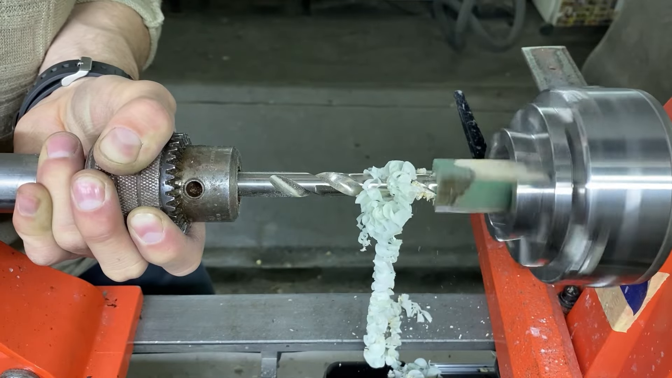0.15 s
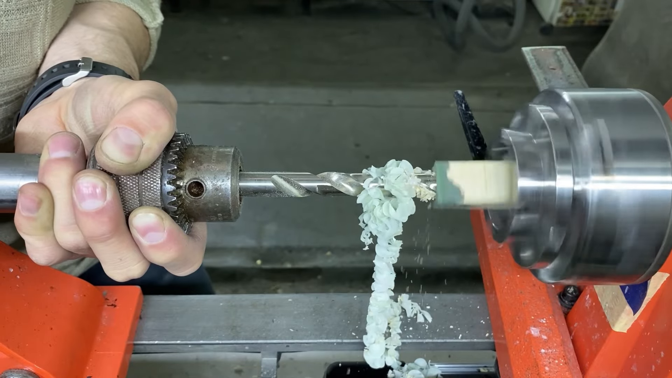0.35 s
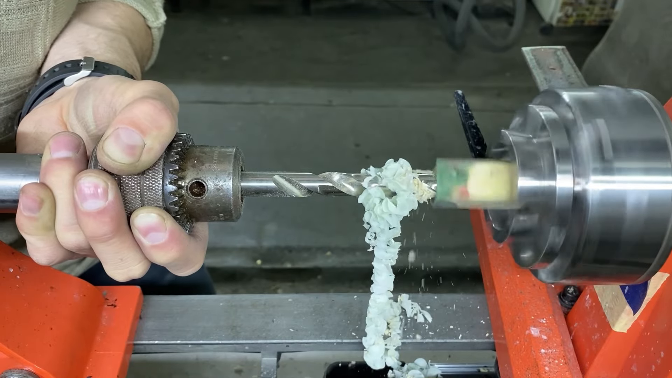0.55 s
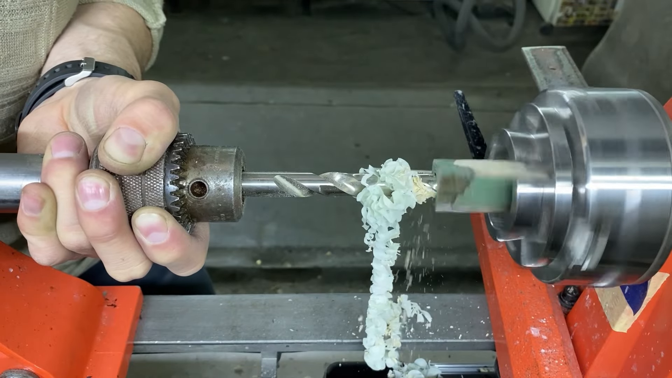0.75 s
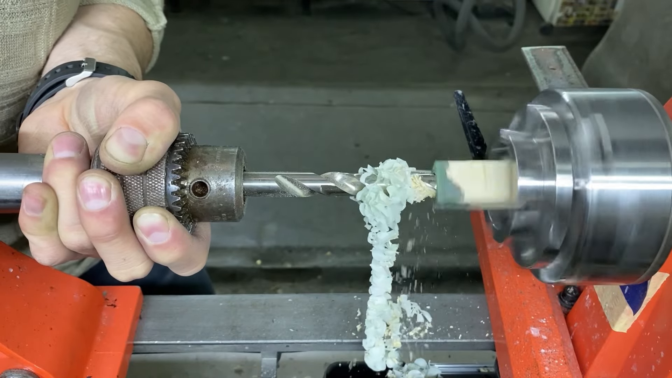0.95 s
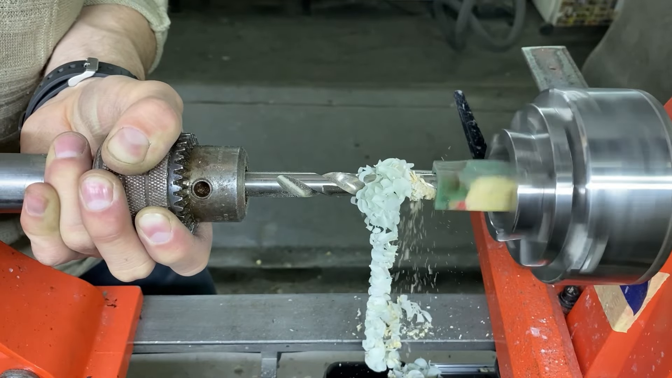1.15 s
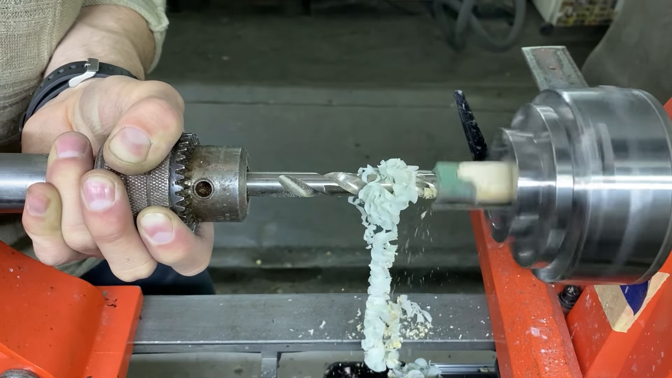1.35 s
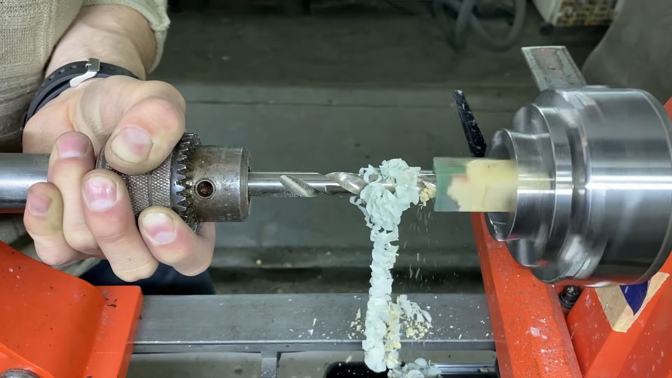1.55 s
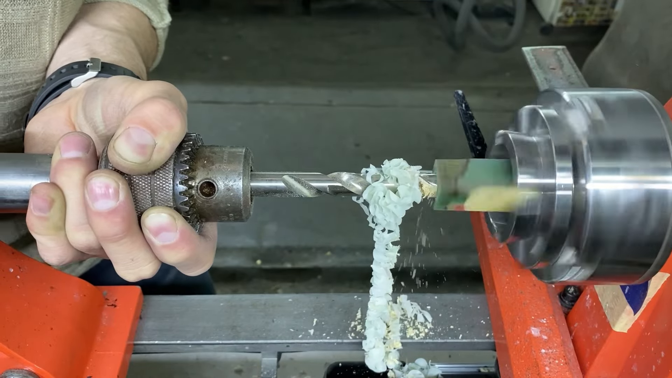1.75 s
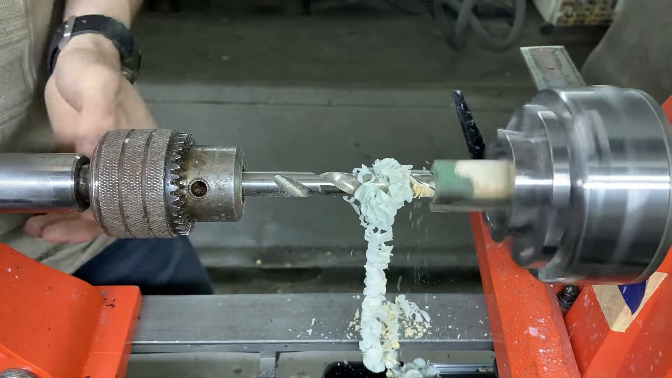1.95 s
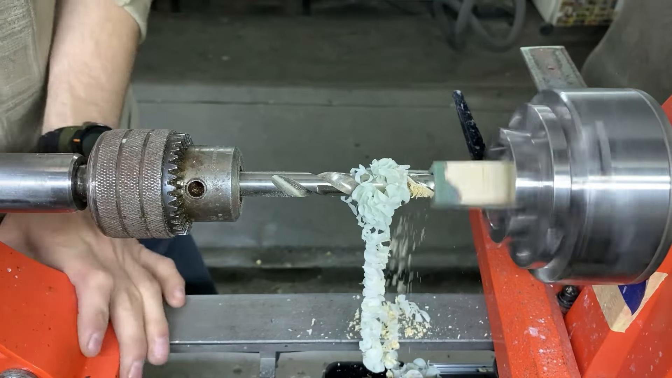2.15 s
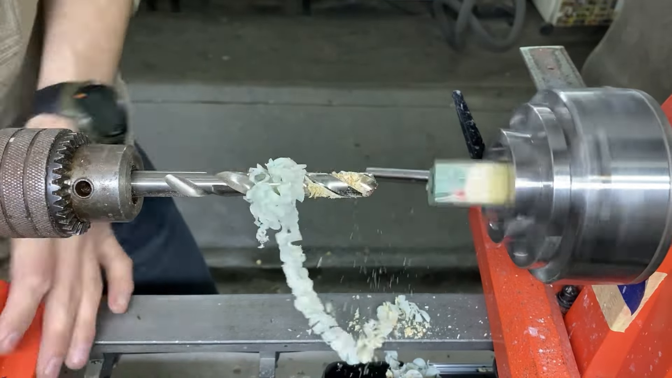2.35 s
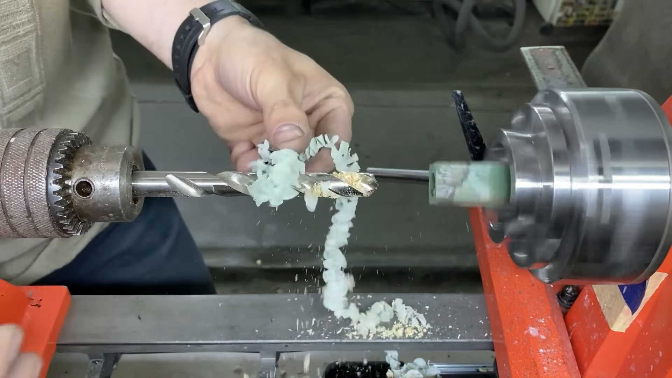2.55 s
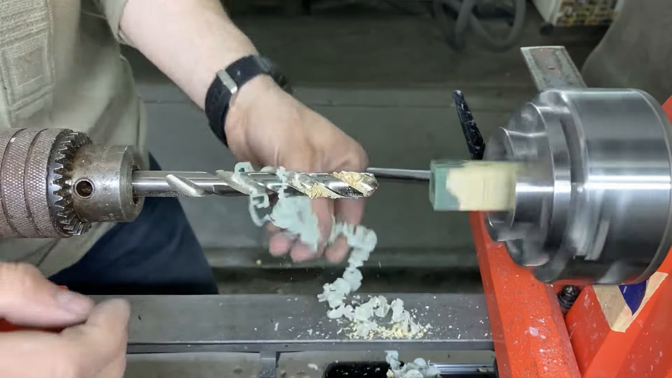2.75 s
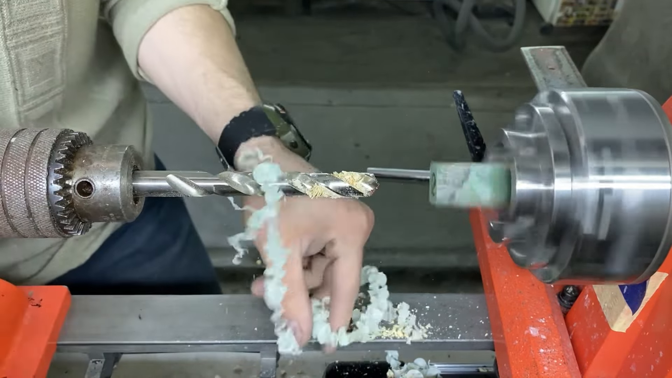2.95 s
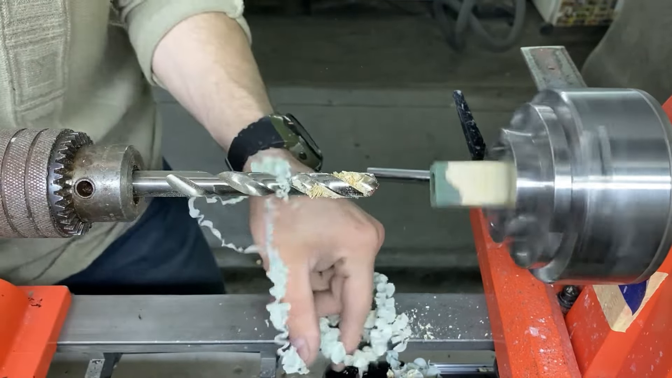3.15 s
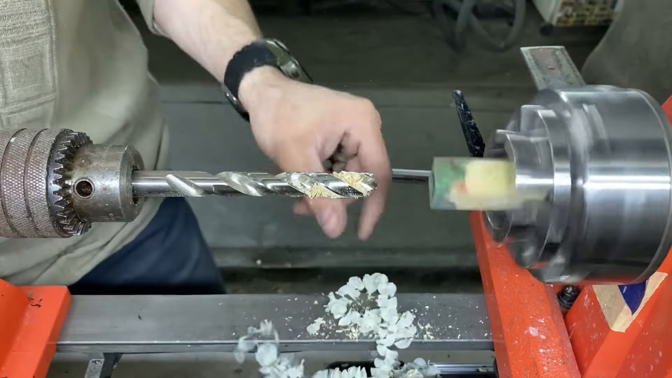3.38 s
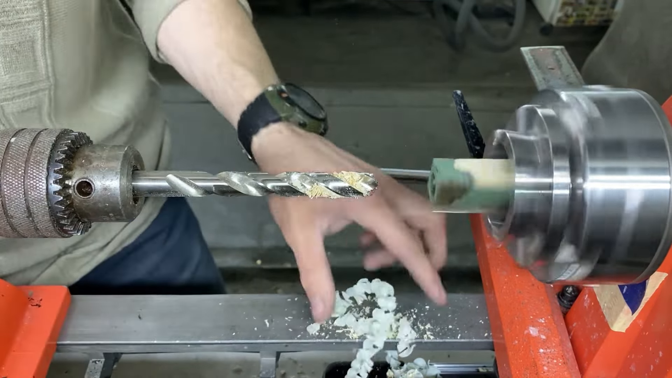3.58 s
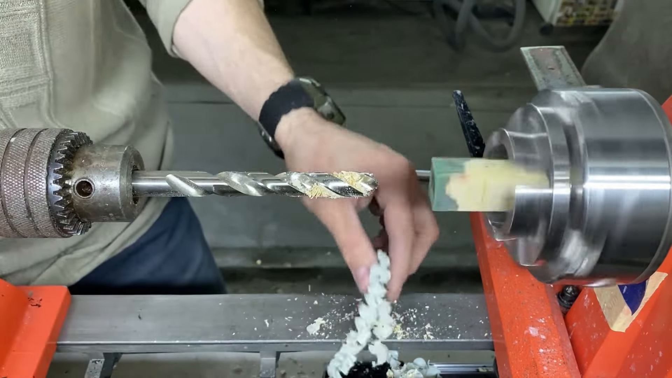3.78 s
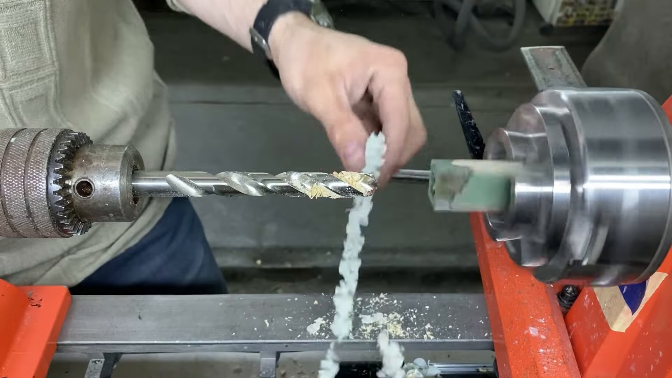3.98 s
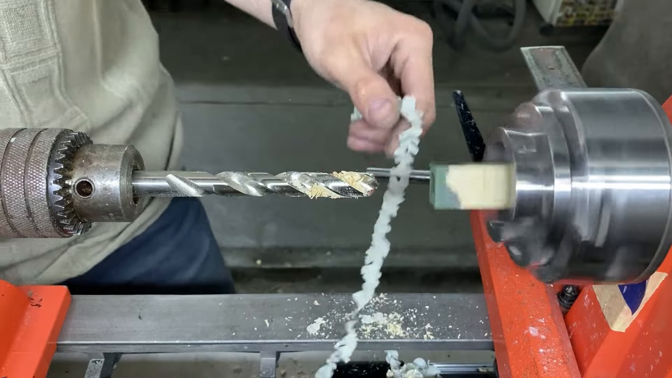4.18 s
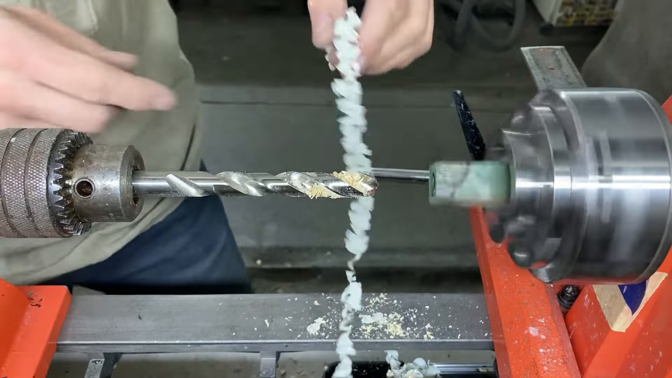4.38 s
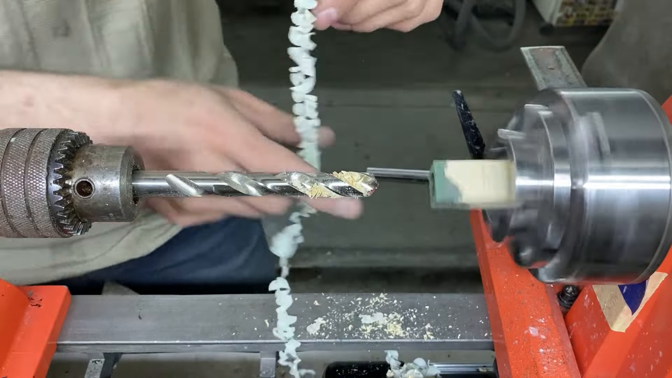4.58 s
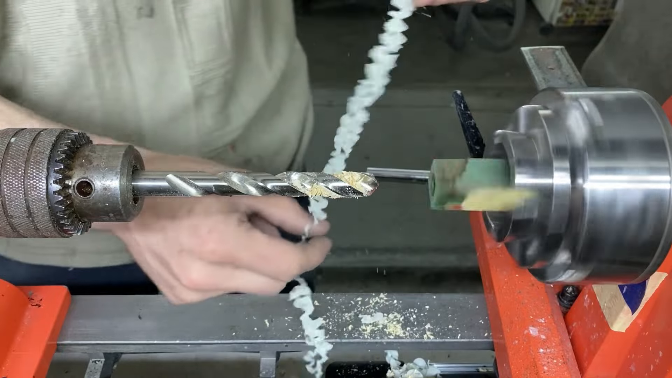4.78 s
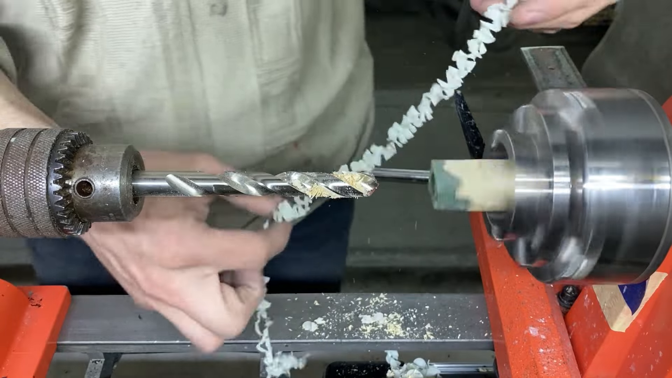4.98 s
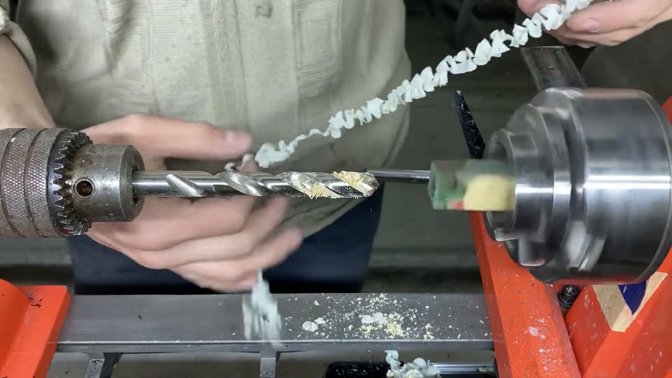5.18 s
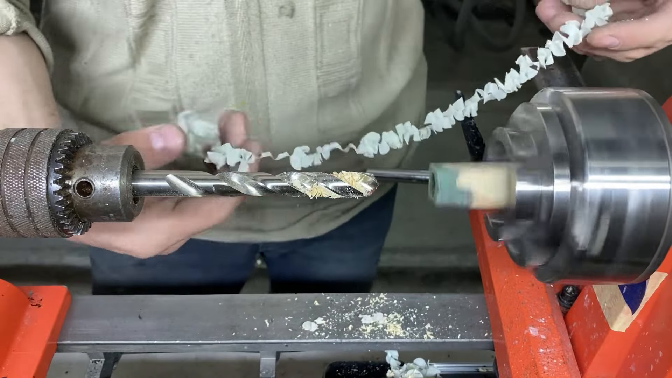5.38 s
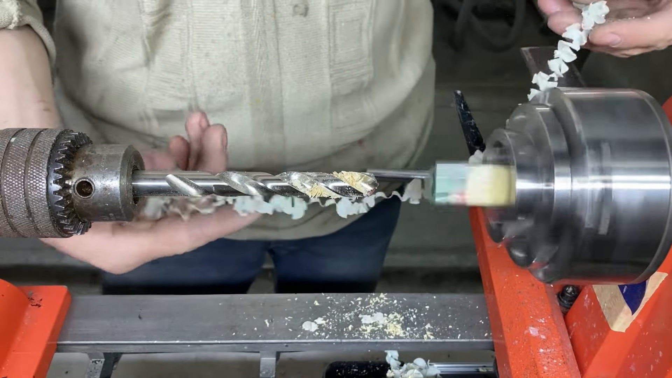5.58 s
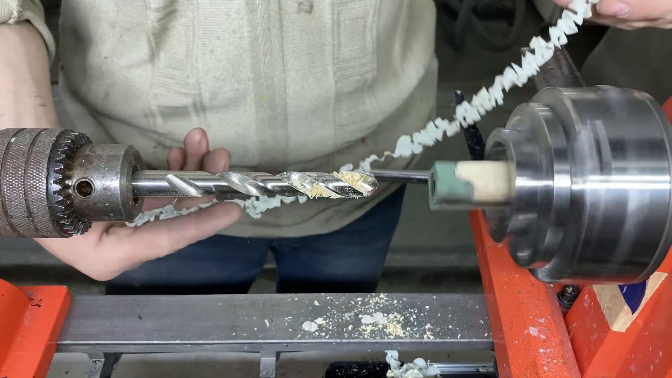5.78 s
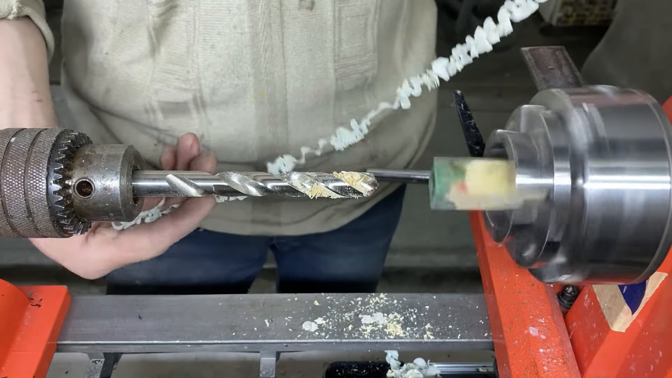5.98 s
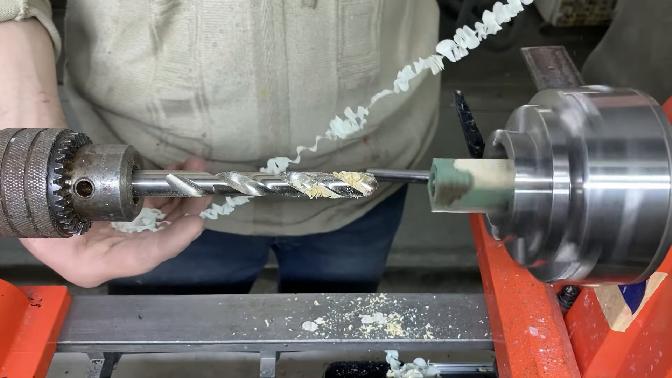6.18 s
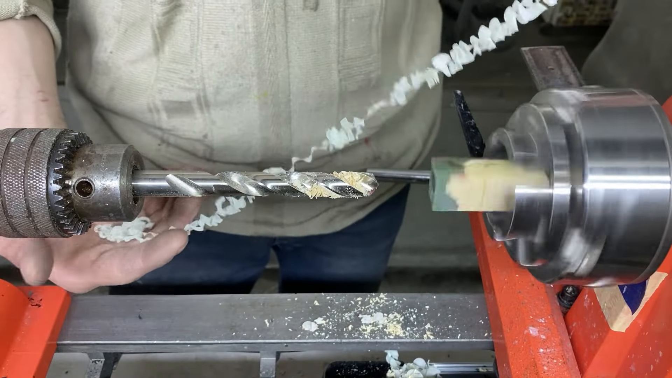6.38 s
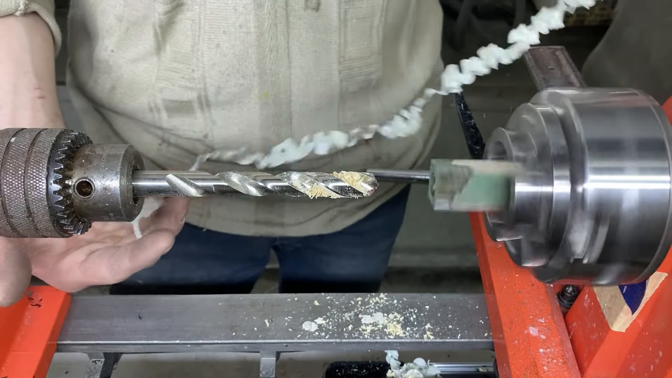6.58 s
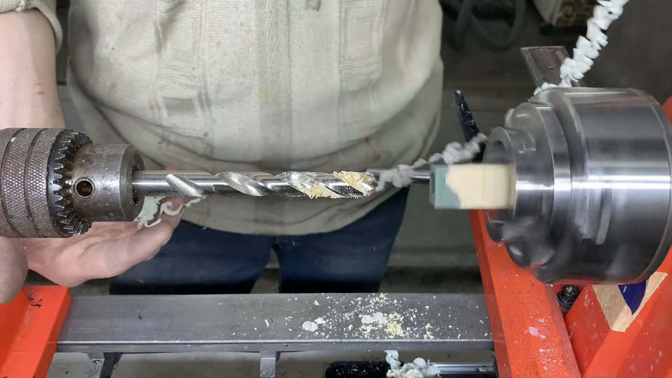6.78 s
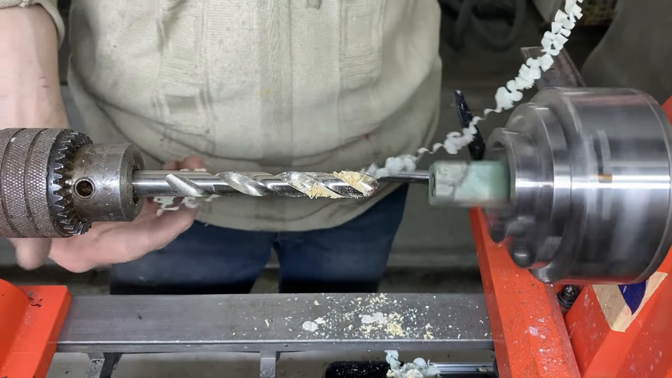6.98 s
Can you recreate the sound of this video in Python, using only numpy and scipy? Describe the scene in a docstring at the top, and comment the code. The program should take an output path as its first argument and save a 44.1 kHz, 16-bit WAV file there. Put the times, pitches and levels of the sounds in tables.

```python
"""A lathe motor hums and whines in a workshop while a drill bit bores noisily into a turning blank.
From the start the bit rubs in its hole and squeaks on every turn, each squeak a short high grab and a slide.
As the bit is drawn out the squeaks drop in pitch, the rumble of the cut ends, and the squeaks stop.
After a soft scuff, a hand tugs the curled swarf away: bursts of tiny snaps rustle over the motor.
The motor is built from steady tones that flutter once it idles; coloured noise is its machinery."""
import sys
import numpy as np
from scipy import signal
from scipy.fft import rfft, irfft, next_fast_len
from scipy.io import wavfile
from scipy.ndimage import uniform_filter1d

SR = 44100
rng = np.random.default_rng(int(sys.argv[2]) if len(sys.argv) > 2 else 0)


def digitize_waveform(pressure):
    """Quantize a signal to 16-bit integers and store it at the path in sys.argv[1].

    Rows of a 2-D input are taken as channels; values are limited to [-1, 1].
    """
    field = np.atleast_2d(pressure).T
    bounded = np.clip(field, -1, 1)
    quanta = np.round(bounded * 32767).astype(np.int16)
    wavfile.write(sys.argv[1], SR, quanta)


N = 310023
SIZE = next_fast_len(N)  # a length that makes the Fourier transforms quick


def gain_of(db):
    """Turn decibels into a plain multiplier."""
    return 10 ** (np.asarray(db) / 20)


def evened(x):
    """Scale a signal to an rms of 1."""
    return x / np.sqrt(np.mean(abs(x) ** 2) + 1e-20)


def read(points, hz):
    """Read a (frequency, value) table at any frequency, on a logarithmic pitch scale."""
    f, value = np.transpose(points)
    return np.interp(np.log(hz + 1), np.log(f + 1), value)


def curves(rows):
    """Join the rows of a table with straight lines in time, one curve for each column."""
    s, *columns = np.transpose(rows)
    t = np.arange(N) / SR
    return [np.interp(t, s, c) for c in columns]


def slow(hz):
    """Random drift of rms 1 up to about hz."""
    t_steps = np.arange(N) / SR * 200  # 200 random steps a second
    steps = rng.standard_normal(int(N / SR * 200) + 2)
    width = max(int(100 / hz), 1)
    smooth = evened(uniform_filter1d(uniform_filter1d(steps, width), width))
    return np.interp(t_steps, np.arange(len(steps)), smooth)


def tone(turn, size, pan_db, lead):
    """A pure tone with a level and phase difference between left and right."""
    side_gain = gain_of([[pan_db / 2], [-pan_db / 2]])
    return size * side_gain * np.cos(turn + np.array([[lead / 2], [-lead / 2]]))


# levels of the machine sounds as heard, sinking during the squeaks and partly recovering after:
# (time [s], strongest motor tone level [dB], broad machine noise level [dB], deep hum level [dB])
MACHINE_LEVELS = [(0.0, -46.5, -59, -46), (0.42, -45, -57, -47.5), (0.7, -51, -63, -52),
                  (1.21, -50, -62, -51.5), (1.7, -53.5, -63.5, -56), (2.04, -52.5, -68.5, -57.5),
                  (2.3, -56.5, -70, -60), (2.5, -51.5, -69, -61), (3.54, -49.5, -68, -61.5),
                  (4.2, -50, -68, -63.5), (4.5, -48.5, -66, -60.5), (5.1, -48, -66, -60),
                  (5.72, -46, -66, -60), (7.03, -47.5, -63.5, -58)]
# pitches of the tones tied to the mains supply: (frequency [Hz], ...)
MAINS_PITCHES = 200.1, 300.1, 400.1, 500.2, 600.3, 700.4, 800.3, 900.4, 1000.5
# mains tones, a row for each pitch: (level when cutting, relative to the strongest [dB],
# same when idle [dB], left minus right [dB], left lead [rad], waver [dB])
MAINS_TONES = [(-20, -28, 7, 0.5, 1), (-14.5, -13, 3.5, -0.3, 2.5), (-24.5, -27, 7, 2, 3.5),
               (-34, -29, -4.5, 4, 3), (-34.5, -27.5, -6.5, 4.5, -1.5), (-43.5, -56, -4.5, -5.5, -3),
               (-37, -35.5, 0.5, -0.5, 10), (-31, -30.5, -1.5, 1.6, 6), (-45, -23, -0.5, -1.5, 1.5)]
# pitches of the rotor slot tones without load: (frequency [Hz], ...)
ROTOR_PITCHES = 622.5, 647, 747, 847.1, 862.5, 947.1, 1047.2, 1147.2, 1347.1, 1694.3, 1794.1, 1844.9, 1894.3
# rotor slot tones, a row for each pitch: (level when cutting, relative to the strongest [dB],
# same when idle [dB], left minus right [dB], left lead [rad], waver [dB])
ROTOR_TONES = [(-38, -22, 2.5, 2, 1.5), (-37, -27, 11.5, 4, 1.5), (3.5, 2.5, -2, 0.67, 1.8),
               (0.5, -1.5, -3.5, -0.36, 1.1), (-27, -21, -2.5, 1.3, 2), (-4.5, -12, -2, 1.1, 1.3),
               (-27.5, -30, -12, -2, 1.43), (-22.5, -20, -6.5, 3.5, 1.5), (-23.5, -26, 2, 4, 1.5),
               (-31.5, -28.5, 2, 0.9, 1.2), (-45, -39, -3, -6, 1.56), (-38.5, -27.5, 3.5, 0, 1.5),
               (-30.5, -26, -2.5, -1, 1.2)]
# brief blips: the strongest tone's pitch jumps through one extra or missing cycle
# and the level of the motor tones changes: (time [s], level change [dB], pitch up 1 or down -1)
BLIPS = [(0.268, -3, 1), (0.701, -4, 1), (1.131, -4, 1), (1.99, -3, 1), (2.141, -4, -1), (2.616, -9, -1),
         (5.765, 1.5, 1)]
# the next rotor tone above the strongest swells and sinks by itself: (time [s], level change [dB])
COMPANION_SWELL = [(0, -3), (2.3, -6), (2.8, -2), (4.1, -5.5), (4.6, -4.5), (5.1, -1), (5.8, -2.5),
                   (7.03, 1.5)]
# shaft sidebands that make the idling whine flutter:
# (frequency [Hz], level relative to the first [dB], left minus right [dB], left lead [rad])
SHAFT_TONES = [(772.4, 0, 2, -.6), (722.5, -8, 5, .5), (822.4, -8, -1, -.4), (922.4, -14, 1, -.8),
               (774.1, -9, 2, -.6), (775.4, -8, 2, -.6), (872, -13, -2, -.6)]
# loudness of the first shaft sideband: (time [s], level [dB])
FLUTTER_LEVEL = [(2.62, -54), (2.88, -51), (3.07, -55), (4.06, -57), (4.35, -54), (4.87, -56), (5.14, -48),
                 (6.44, -57), (7.03, -50)]
HUM_HZ, LOAD_SAG_HZ, IDLE_S = 100.03, 2.8, 2.62
BLIP_S = .014  # time scale of a one-cycle pitch blip


def motor():
    """Mains tones hold their pitch; rotor slot tones sag under load; idling adds shaft sidebands."""
    t = np.arange(N) / SR
    idle = np.clip((t - IDLE_S) / .03, 0, 1)
    free = np.clip((t - 1.75) / 0.25, 0, 1)  # the load falls away as the bit is drawn out
    blip_db = sum(db * np.exp(-((t - s) / 0.013) ** 2) for s, db, _ in BLIPS)
    blip_turn = sum(np.pi * way * (1 + np.tanh((t - s) / BLIP_S)) for s, _, way in BLIPS)
    whine_db, _, hum_db = curves(MACHINE_LEVELS)
    companion_db = curves(COMPANION_SWELL)[0]
    flutter_db = curves(FLUTTER_LEVEL)[0]
    out = tone(2 * np.pi * HUM_HZ * t, gain_of(hum_db + 1.2 * slow(4.0)), 0.74, 0.22)
    families = ((MAINS_PITCHES, MAINS_TONES, 0 * t),
                (ROTOR_PITCHES, ROTOR_TONES, LOAD_SAG_HZ * (1 - free)))
    for pitches, rows, sag_hz in families:
        start = rng.uniform(0, 2 * np.pi)  # one family keeps in step, so it throbs
        for hz, (cut_db, idle_db, pan_db, lead, waver_db) in zip(pitches, rows):
            turn = 2 * np.pi * np.cumsum(hz - sag_hz) / SR + start
            level_db = whine_db + cut_db + (idle_db - cut_db) * idle + waver_db * slow(3.8)
            if hz == ROTOR_PITCHES[2]:  # the strongest
                turn = turn + blip_turn
            if hz == ROTOR_PITCHES[3]:
                level_db = level_db + companion_db
            out += tone(turn, gain_of(level_db), pan_db, lead)
    for hz, db, pan_db, lead in SHAFT_TONES:
        size = idle * gain_of(flutter_db + db + 0.19 * slow(1.1))
        out += tone(2 * np.pi * (hz * t + rng.random()), size, pan_db, lead)
    return np.sqrt(2) * out * gain_of(blip_db)  # the root of 2 makes the tone levels rms levels


def humps(modes, hz):
    """Resonances, each a bump in the colour of a noise."""
    return sum(db / (1 + ((hz - f) / width) ** 2) for f, width, db in modes)


# how alike the noise is in both ears: (frequency [Hz], left-right likeness [0-1])
LIKENESS = [(60, 0.73), (180, 0.88), (550, 0.26), (1650, 0.42), (4970, 0.12), (15000, 0.56)]


def noise(colour_db, band, patchy_db):
    """Two-channel noise of the given colour with drifting patches, rms 1 inside the band."""
    frames, hz = N // 256 + 5, np.fft.rfftfreq(1024, 1 / SR)
    a, b, c, d, patches = rng.standard_normal((frames, 513, 5)).T
    patches = evened(uniform_filter1d(uniform_filter1d(patches, 10, 0), 8, 1))
    same = np.clip(read(LIKENESS, hz), -1, 1)[:, None]
    left = a + 1j * b
    right = same * left + np.sqrt(1 - same ** 2) * (c + 1j * d)
    z = np.array([left, right]) * gain_of(colour_db(hz)[:, None] + patchy_db * patches)
    power = (abs(z.mean(0)) ** 2).sum(1)
    share = power[(hz > band[0]) & (hz < band[1])].sum() / power.sum()
    out = signal.istft(z, nperseg=1024, noverlap=768)[1][:, :N]
    return out / (np.std(out.mean(0)) * np.sqrt(share))


# colour of the machine noise: (frequency [Hz], relative level per Hz [dB])
MACHINE_COLOUR = [(20, -18.5), (40, -8), (65, 1), (130, 3.5), (250, 3.5), (450, 0), (650, -2), (1000, 5),
                  (1400, -2), (2050, -2), (2600, -7), (5000, -8.5), (8000, -20), (10000, -12),
                  (14000, -24.5), (16300, -33)]
# resonances of the casing: (frequency [Hz], width [Hz], boost [dB])
CASING_MODES = [(83, 5.9, 14.5), (798, 76, 15), (1838, 42, 11), (2178, 36, 3), (2980, 170, 3.5),
                (3430, 90, 4), (4250, 230, 6), (6400, 130, 7.5)]


def machine_noise():
    """Fan, belt and bearings: noise that rings in the casing."""
    roar = noise(lambda hz: read(MACHINE_COLOUR, hz) + humps(CASING_MODES, hz), (1200, 2300), 1.3)
    return gain_of(curves(MACHINE_LEVELS)[1] + .5 * slow(8.0)) * roar


# loudness of the cut between 130 and 450 Hz: (time [s], level [dB])
CUTTING_LEVEL = [(0.0, -47.5), (0.37, -48), (0.46, -44), (0.56, -48.5), (0.64, -45.5), (0.72, -51),
                 (1.25, -51.5), (1.75, -53.5)]
# colour of the cut: (frequency [Hz], relative level per Hz [dB])
CUT_COLOUR = [(70, -31.5), (130, -18.5), (400, -8), (600, -26), (1200, -19.5), (2000, -32.5), (3500, -25),
              (5600, -29), (8000, -31.5), (11000, -15), (13000, -32.5), (16000, -51)]
# what the cut shakes into ringing: (frequency [Hz], width [Hz], boost [dB])
SHAKEN_MODES = [(169, 17, 17), (290, 40, 5.5), (2505, 240, 13.5), (6410, 540, 19)]


def cutting():
    """The edge tearing the material: a lumpy rumble and hiss that end when the bit leaves the cut."""
    engaged = np.clip((1.83 - np.arange(N) / SR) / 0.033, 0, 1)
    tear = noise(lambda hz: read(CUT_COLOUR, hz) + humps(SHAKEN_MODES, hz), (130, 450), 1.0)
    return engaged * gain_of(curves(CUTTING_LEVEL)[0] + 1.4 * slow(40.0)) * tear


def jitter(grit, length):
    """Smooth two rows of random numbers into one complex unsteadiness of rms 1."""
    for _ in range(3):
        grit = uniform_filter1d(grit, length)
    return evened(grit[0] + 1j * grit[1])


# third and fourth harmonics, by the pitch at which they land:
# (frequency [Hz], level relative to the squeak [dB])
UPPER_HARMONICS = [(8500, -15), (10000, -0.5), (11500, -4), (13000, -12.5), (14000, -19.5), (15500, -23.5),
                   (17000, -35.5)]


def stick_slip(hz, size, unsteady, second):
    """A tone on the pitch curve hz, unsteady in size and phase; its jerky motion adds harmonics."""
    turn = 2 * np.pi * np.cumsum(hz) / SR + 1.05 * unsteady.imag
    upper = sum(gain_of(read(UPPER_HARMONICS, k * hz)) * np.cos(k * turn) for k in (3, 4))
    wave = np.cos(turn) + second * np.cos(2 * turn) + upper
    return size * np.exp(.7 * unsteady.real) * wave


def lobe(u, centre, before, after):
    """A bell with its own width on each side."""
    return np.exp(-((u - centre) / np.where(u < centre, before, after)) ** 2)


# second harmonic by its pitch: (frequency [Hz], level relative to the squeak, before the lift [dB])
SECOND_HARMONIC = [(6500, -6.5), (7200, -13.5), (8000, -13.5), (8800, -9.5), (9400, -4), (10000, -0.5),
                   (10400, 4)]
GRAB_RISE_MS, GRAB_FADE_MS, GRAB_SAG_HZ_PER_MS = 3.4, 4.6, 10.5
SLIDE_RISE, SLIDE_FADE = 0.87, 0.97  # shares of the slide length
SLIDE_CURL = 0.456  # the glide bends upward [Hz per ms squared]
GLIDE_MS = 9.6  # a slide levels off this far from its centre


def squeak(rough, lift_db, grit, grab_hz, grab_db, after_ms, slide_hz, slide_db, glide, length_ms):
    """The bit grabs on a high note that sags, then hops to a note, mostly lower, that slides."""
    u = (np.arange(3000) - 1000) / SR * 1000  # ms from the grab
    v = GLIDE_MS * np.tanh((u - after_ms) / GLIDE_MS)
    grab_curve = grab_hz - GRAB_SAG_HZ_PER_MS * u
    grab_size = gain_of(grab_db) * lobe(u, 0, GRAB_RISE_MS, GRAB_FADE_MS)
    slide_curve = slide_hz + glide * v + SLIDE_CURL * v ** 2
    slide_bell = lobe(u, after_ms, SLIDE_RISE * length_ms, SLIDE_FADE * length_ms)
    slide_size = gain_of(slide_db) * slide_bell
    out = 0
    for hz, size, g in ((grab_curve, grab_size, grit[:2]), (slide_curve, slide_size, grit[2:])):
        second = gain_of(lift_db + read(SECOND_HARMONIC, 2 * hz))
        out = out + stick_slip(hz, size, rough * jitter(g, 42), second)
    return out


def bench(x):
    """Echoes from the bed, chuck and walls: sparse taps of random sign, others for each ear."""
    at = np.arange(40, 6000, 20) + rng.integers(0, 20, (2, 298))
    taps = np.zeros((2, 6020))
    np.put_along_axis(taps, at, rng.choice([-1., 1.], at.shape), 1)
    taps *= gain_of(-60 * np.arange(6020) / SR / .085)  # falls 60 dB in 85 ms
    return signal.fftconvolve(x[None], taps / np.linalg.norm(taps[0]), axes=1)[:, :N]


# the rubbing, with levels before the echo is added: (time [s], steady rub pitch [Hz],
# steady rub level [dB], squeak roughness [0-1], squeak second harmonic lift [dB])
RUB_CURVES = [(0, 4780, -46, 0.48, -9), (.6, 4757, -42, 0.26, -0.5), (1.0, 4755, -43, 0.42, 2),
              (1.74, 4834, -39, 0.31, 1.5), (1.79, 4250, -24, 0.33, -0.5), (1.83, 3800, -33.5, 0.1, 1),
              (1.95, 3598, -31.5, 0.42, 1.5), (2.24, 3450, -43.5, 0.42, 1), (2.28, 3340, -55, .3, -6.5)]
# one squeak per turn of the blank, a short high grab and a longer slide, levels before the echo:
# (grab time [s], grab pitch [Hz], grab level [dB], slide centre after the grab [ms],
# slide pitch [Hz], slide level [dB], slide glide [Hz per ms], slide length [ms])
TURN_SQUEAKS = [(0.012, 4860, -19, 9, 4350, -21.5, 7.5, 8.8), (0.052, 4856, -16.5, 7, 4690, -21, -15, 12.3),
                (0.091, 4940, -25.5, 20.5, 4740, -19.5, 24.5, 7.7),
                (0.145, 4930, -39, 8.5, 4760, -21, 4.5, 7.6),
                (0.184, 4960, -22, 6.5, 4685, -21, -10.5, 9.1),
                (0.222, 4770, -26, 8, 4640, -25.5, -14.5, 10.6),
                (0.273, 4940, -36, 9.5, 4720, -36, 17.5, 7.9),
                (0.317, 4960, -23.5, 6.5, 4680, -22, 0.5, 5.9),
                (0.354, 5100, -22, 9.5, 4695, -21, 5.5, 11.5),
                (0.403, 4970, -27.5, 5.5, 4650, -26, 15.5, 8.3),
                (0.446, 5080, -19.5, 6.5, 4640, -26, 34.5, 6.5),
                (0.483, 5055, -11.5, 6, 4710, -24, -18, 11), (0.522, 4950, -20, 12.5, 4734, -23.5, -5, 15),
                (0.576, 5000, -28, 5.5, 4660, -25.5, -8.5, 8.3),
                (0.612, 5075, -13, 9.5, 4550, -16.5, 10, 3.8),
                (0.654, 4970, -14.5, 11.5, 4680, -24, -13.5, 21),
                (0.704, 4980, -28.5, 8, 4600, -23.5, 37, 9.2),
                (0.745, 5020, -19.5, 7, 4610, -23.5, -18, 4.4),
                (0.784, 4960, -16.5, 9, 4635, -23, -15, 8.5), (0.824, 4850, -23, 14, 4630, -24, -13.5, 8.5),
                (0.876, 5000, -33.5, 1.5, 4430, -24.5, 14.5, 7.7),
                (0.918, 5006, -20.5, 2, 4510, -25, 32.5, 7.4),
                (0.955, 4940, -22.5, 8, 4750, -28, -16.5, 15.6),
                (1.004, 4960, -30, 10.5, 4735, -21.5, 31, 10),
                (1.049, 5040, -25.5, 6, 4745, -23.5, 33.5, 12), (1.089, 4940, -19, 8, 4864, -29, -1.5, 8.2),
                (1.127, 4875, -20, 19.5, 4770, -24.5, 39, 8),
                (1.173, 4970, -33.5, 10, 4566, -22.5, 34, 13.9),
                (1.222, 5050, -28.5, 3.5, 4704, -17.5, 24.5, 7.6),
                (1.259, 4970, -18.5, 6, 4710, -21, -13.5, 13.4),
                (1.298, 4960, -23, 18, 4650, -21.5, 18.5, 11.6),
                (1.352, 4930, -38, 4.5, 4683, -18, 35.5, 8.8), (1.395, 4950, -20, 5.5, 4730, -16, 26, 7.1),
                (1.433, 4890, -19, 8, 4670, -23, -10, 11), (1.473, 4880, -29.5, 14.5, 4610, -21.5, 21, 9.7),
                (1.522, 5180, -25.5, 9.5, 4720, -21, 23, 10),
                (1.559, 5125, -19.5, 14, 4840, -24.5, 7.5, 10),
                (1.606, 4750, -16.5, 5, 4750, -24.5, -17.5, 8.1),
                (1.649, 4800, -38, 9, 4684, -22.5, 8.5, 15), (1.697, 5180, -29.5, 4.5, 4735, -24, 9.5, 13),
                (1.739, 4930, -19.5, 6.5, 4726, -22.5, -16.5, 14.7),
                (1.783, 4525, -18.5, 6, 4154, -19.5, -15, 10),
                (1.825, 3880, -20, -1.5, 3668, -20.5, -6.5, 16),
                (1.867, 3917, -19, 8, 3636, -18, -4.5, 5.9), (1.91, 3735, -17.5, 2, 3525, -29, -1, 11),
                (1.951, 3700, -24, 4.5, 3490, -16, 1, 6.7), (1.987, 3960, -26.5, 11.5, 3370, -24.5, -2, 14),
                (2.036, 3810, -46, 2.5, 3387, -22, -10, 6.95), (2.074, 3830, -24, -0.5, 3486, -24, -16, 14),
                (2.124, 3814, -25.5, 3, 3320, -27, 1, 7.9), (2.16, 3780, -22.5, 0, 3290, -24, 2.5, 11.3),
                (2.199, 3900, -26.5, 0.5, 3660, -30, 0, 11), (2.248, 3880, -31, 0, 3270, -22.5, -1, 5.7)]
# the squeal at the two microphone ports: (frequency [Hz], left minus right [dB], left lead [rad])
PORT_DIFFERENCES = [(3740, -5, -1.4), (4890, -6.5, -0.72), (5570, -4, -0.5), (8100, -6, -2.5),
                    (8800, -2.5, -1.3), (9500, -.8, -1.94), (10600, 0.5, 1), (12000, -0.5, 0)]


def squeal():
    """A squeak on every turn over a faint steady rub, heard directly and off the bench."""
    centre_hz, rub_db, rough, lift_db = curves(RUB_CURVES)
    # the real part of the jitter has an rms near 0.7, so the pitch strays by about 180 Hz rms
    wander = centre_hz + 260 * jitter(rng.standard_normal((2, N)), 150).real
    rub = gain_of(rub_db) * (np.arange(N) < RUB_CURVES[-1][0] * SR)
    dry = stick_slip(wander, rub, 0.55 * jitter(rng.standard_normal((2, N)), 60), 0.5)
    grit = rng.standard_normal((len(TURN_SQUEAKS), 4, 3000))
    for (s, *shape), g in zip(TURN_SQUEAKS, grit):
        where = round(s * SR) + np.arange(-1000, 2000)
        inside = np.maximum(where, 0)
        one = squeak(rough[inside], lift_db[inside], g, *shape)
        dry[where[where >= 0]] += one[where >= 0]
    hz = np.fft.rfftfreq(SIZE, 1 / SR)
    f, pan_db, lead = np.transpose(PORT_DIFFERENCES)
    half = gain_of(np.interp(hz, f, pan_db) / 2) * np.exp(.5j * np.interp(hz, f, lead))
    # the echo is made weaker towards high frequencies
    echo_colour = gain_of(-16.0 * np.clip((hz - 5500) / 7000, 0, 1))
    echo = echo_colour * rfft(bench(dry), SIZE)
    both = rfft(dry, SIZE) + gain_of(-2.0) * echo
    return irfft(np.array([half, 1 / half]) * both, SIZE)[:, :N]


# a single scuff: (time [s], level [dB], middle frequency [Hz], bell width [ms])
SCUFF = (2.333, -63, 3500, 10)


def scuff():
    """A soft, broad scuff: a short bell of noise two octaves wide."""
    s, db, hz, ms = SCUFF
    band = signal.butter(2, [.5 * hz, 2 * hz], "band", fs=SR, output="sos")
    hiss = evened(signal.sosfilt(band, rng.standard_normal((2, N))))
    return gain_of(db) * hiss * np.exp(-((np.arange(N) / SR - s) * 1000 / ms) ** 2)


# colour of the rustle: (frequency [Hz], relative level per Hz [dB])
SWARF_COLOUR = [(2500, -30), (4000, -23), (6000, -2), (8000, -4.5), (10000, 1), (12500, 1.5), (15000, -16),
                (16500, -15)]
# tugs of the hand, with levels before the direct sound and echo are mixed:
# (peak time [s], peak level [dB], build-up [ms], fade [ms])
HAND_TUGS = [(2.481, -65, 22, 17), (2.527, -64, 5, 6), (2.655, -70, 29, 28), (2.76, -65, 8, 15),
             (2.89, -67.5, 29, 18), (2.966, -59.5, 60, 13), (3.13, -72, 20, 12), (3.312, -70, 4.8, 11),
             (3.47, -71, 20, 16), (3.582, -62, 5, 20), (3.673, -65, 11, 13.4), (3.72, -74.5, 8, 10),
             (3.8, -77, 200, 290), (3.83, -75, 6, 10), (3.93, -74, 30, 15), (4.73, -69, 32, 37),
             (4.82, -66.5, 40, 20), (5.13, -78, 27, 30), (6.069, -71, 6.2, 8.6), (6.3, -71, 14, 32),
             (6.4, -73, 9, 20), (6.52, -59.5, 12, 17), (6.67, -76, 8.3, 15)]
HANDLING_DB, HANDLING_S = -85, 2.42  # the ribbon stirs faintly between tugs: level before the mix, start


def swarf():
    """Tiny snaps of the curled ribbon, thick enough to blur into a rustle."""
    snap_size = gain_of(4.3 * np.minimum(rng.exponential(1, N), 4))
    snap_here = rng.random(N) < 1400 / SR  # about 1400 snaps a second
    snaps = snap_size * snap_here * rng.choice([-1., 1.], N)
    hz = np.fft.rfftfreq(SIZE, 1 / SR)
    coloured = rfft(snaps, SIZE) * gain_of(read(SWARF_COLOUR, hz))
    dry = irfft(coloured, SIZE)[:N]
    dry /= np.std(irfft(coloured * (hz > 7000) * (hz < 15000), SIZE))  # rms 1 in this band
    ms = np.arange(N) / SR * 1000
    stir = gain_of(HANDLING_DB + 5.3 * slow(8.0)) * (ms > 1000 * HANDLING_S)
    tugs = sum(gain_of(db) * lobe(ms, 1000 * s, rise, fade) for s, db, rise, fade in HAND_TUGS)
    dry *= stir + tugs
    return .8 * dry + .3 * bench(dry)


def scene():
    """All the sounds of the workshop together."""
    return motor() + machine_noise() + cutting() + squeal() + scuff() + swarf()


def record(dry):
    """The microphone drops the deepest bass; then a steep filter cuts the top above 16150 Hz."""
    dry = signal.sosfilt(signal.butter(2, 45, "high", fs=SR, output="sos"), dry)
    low_pass = signal.firwin(511, 16150, window=("kaiser", 9), fs=SR)
    return signal.oaconvolve(dry, low_pass[None], "same")


dry = scene()
out = record(dry)
digitize_waveform(out)
```